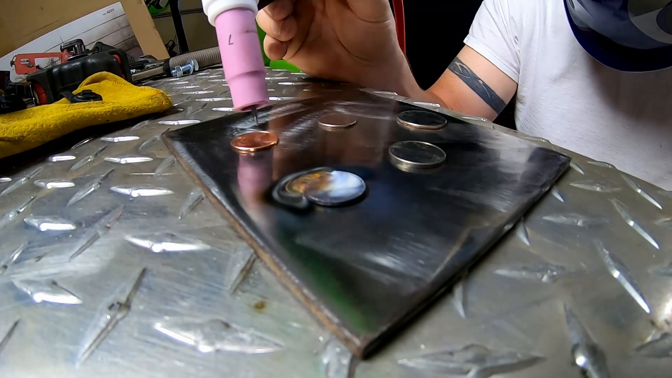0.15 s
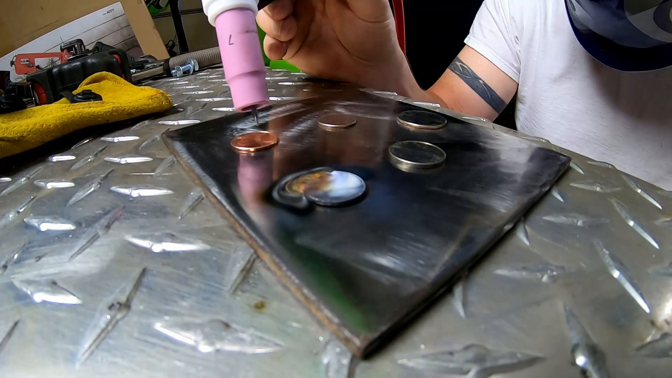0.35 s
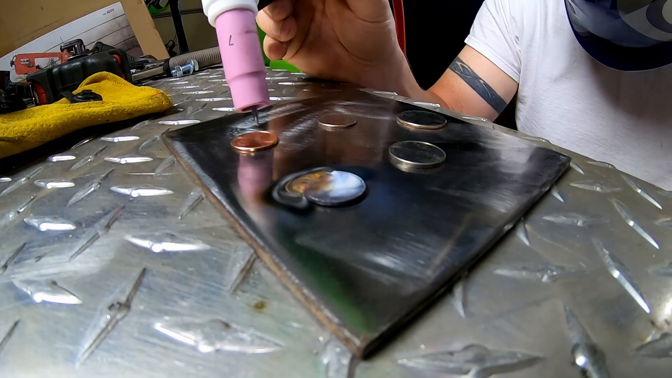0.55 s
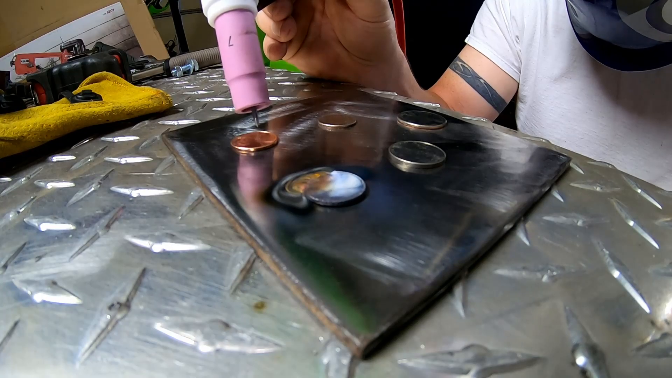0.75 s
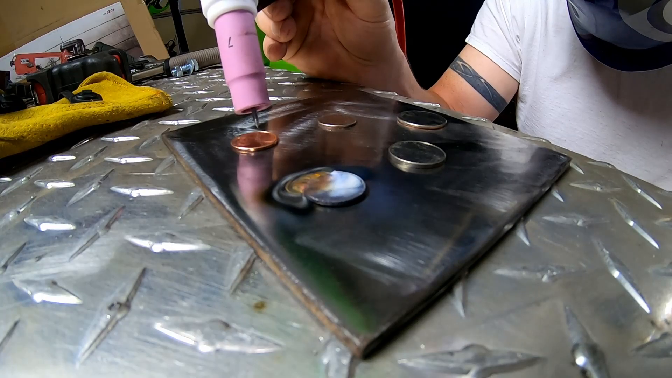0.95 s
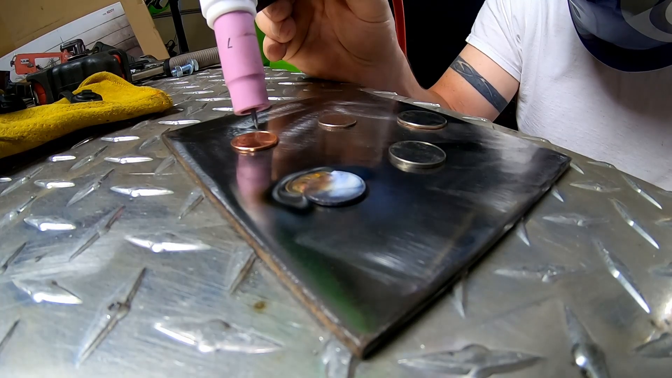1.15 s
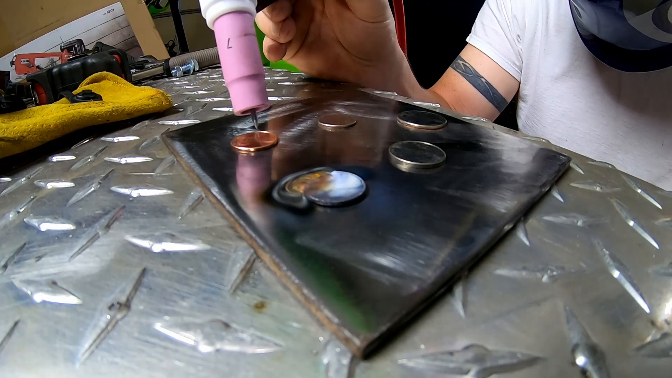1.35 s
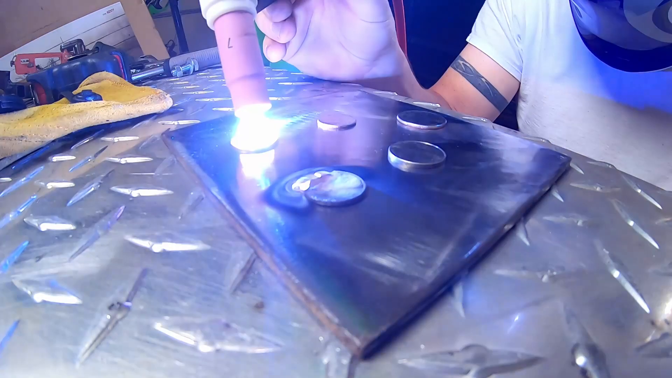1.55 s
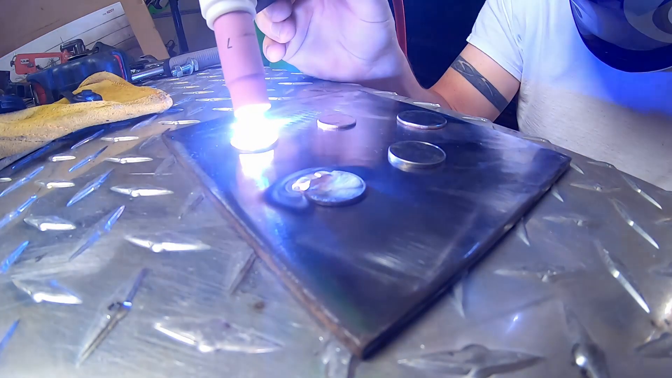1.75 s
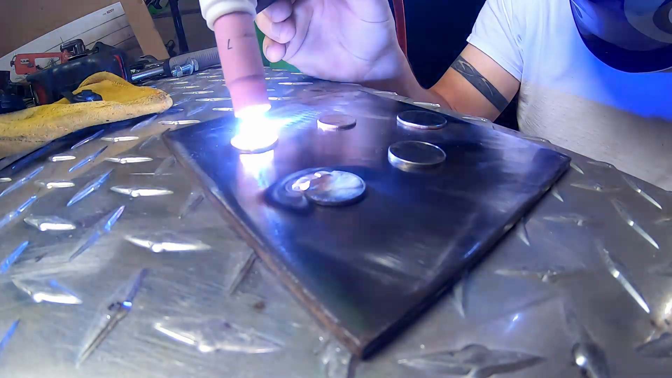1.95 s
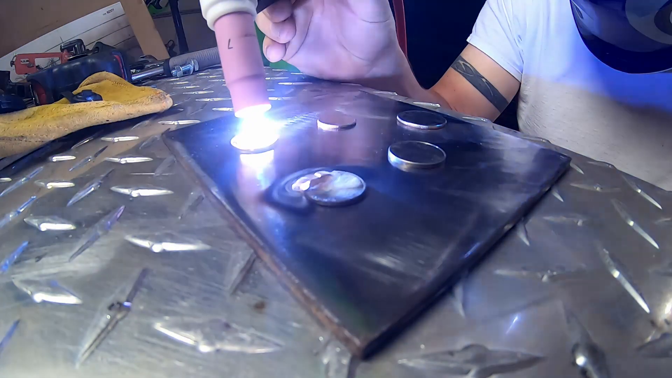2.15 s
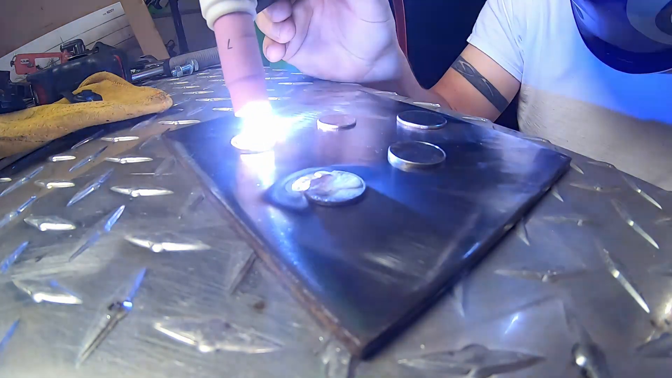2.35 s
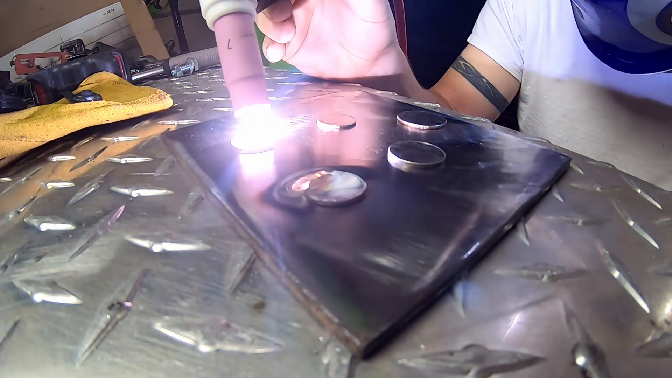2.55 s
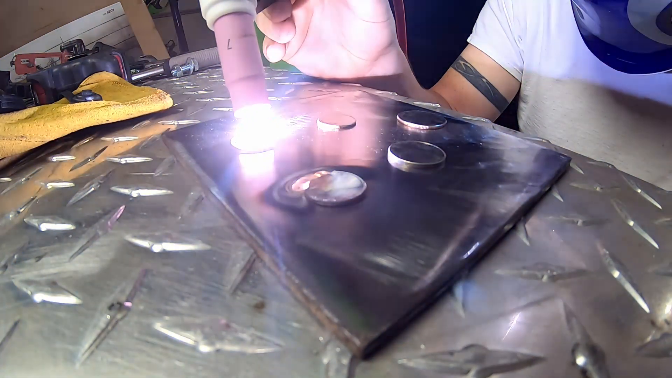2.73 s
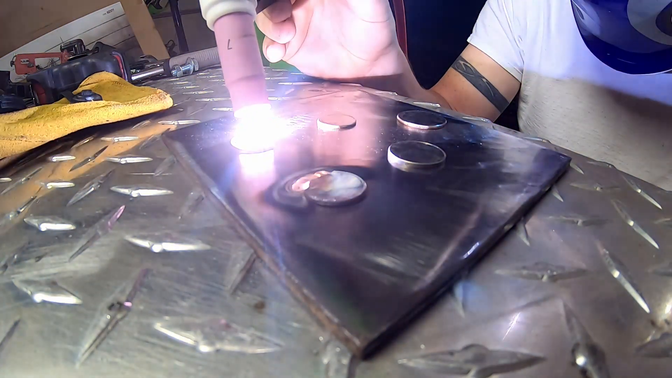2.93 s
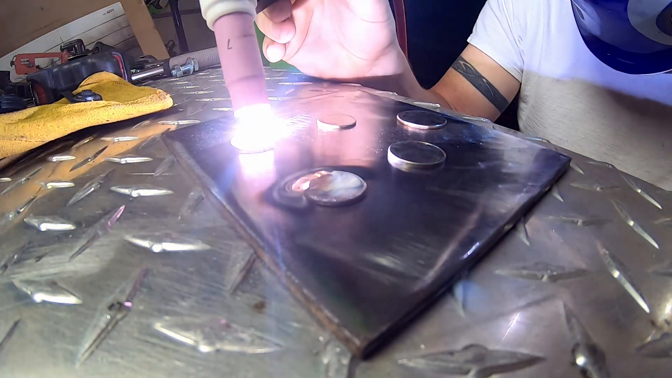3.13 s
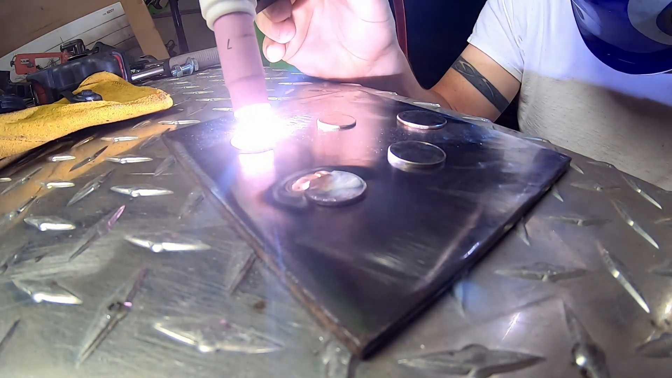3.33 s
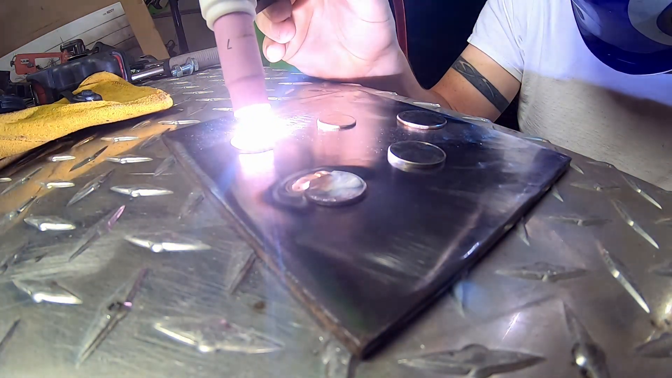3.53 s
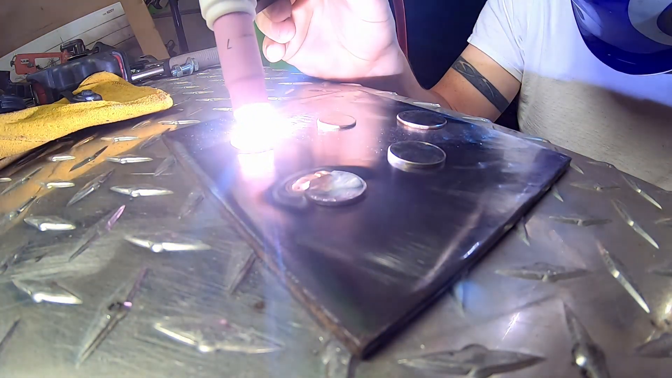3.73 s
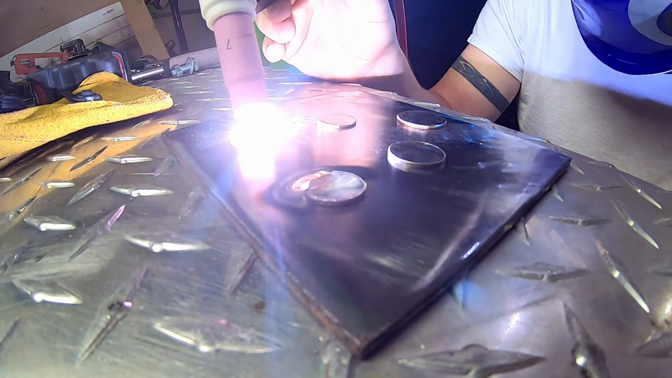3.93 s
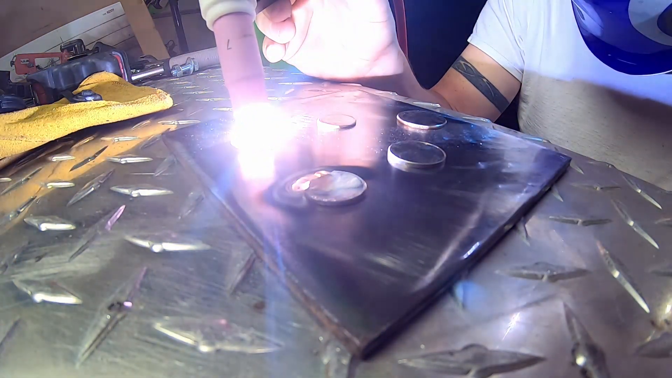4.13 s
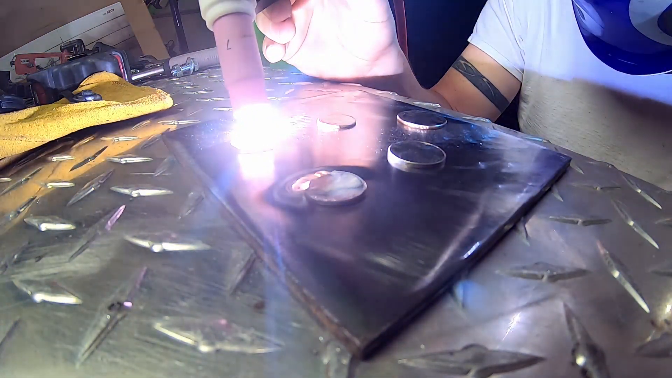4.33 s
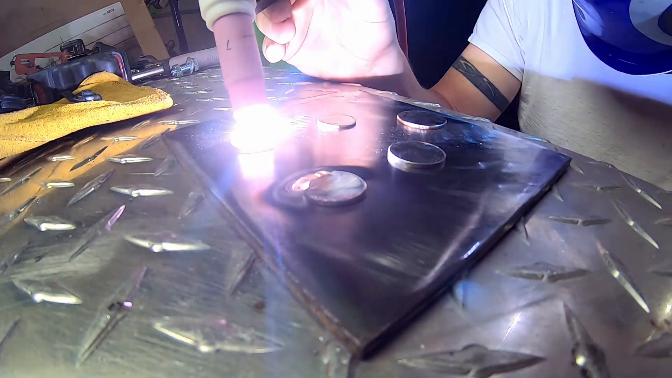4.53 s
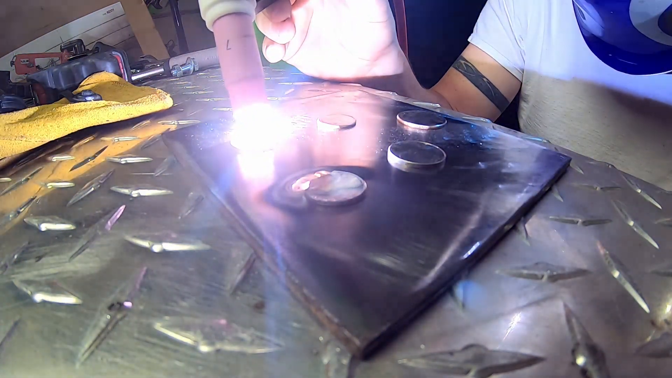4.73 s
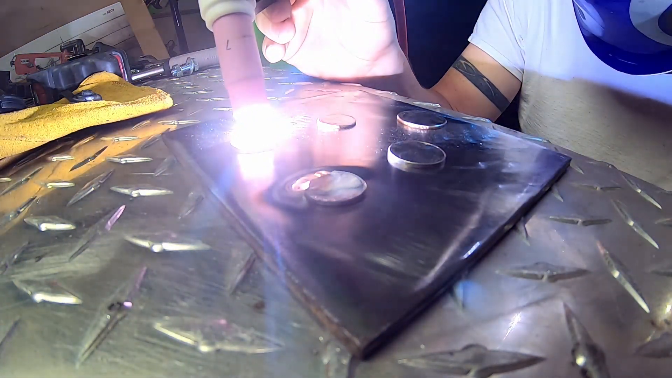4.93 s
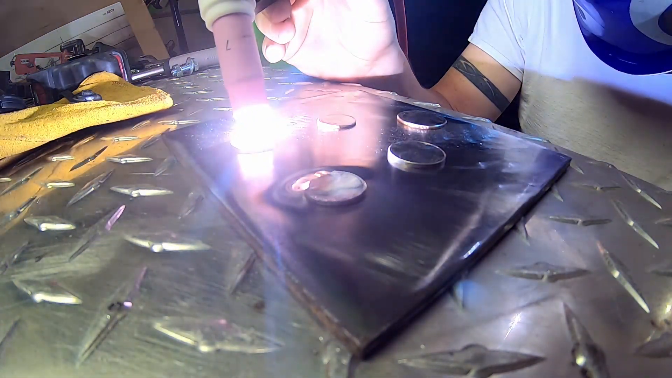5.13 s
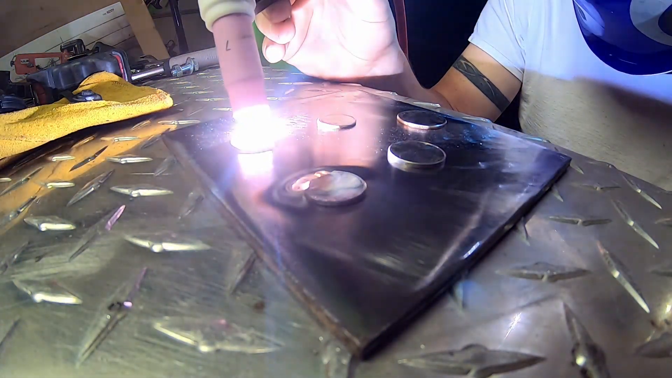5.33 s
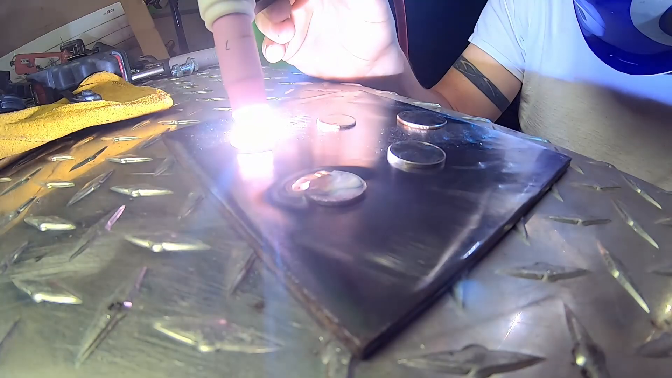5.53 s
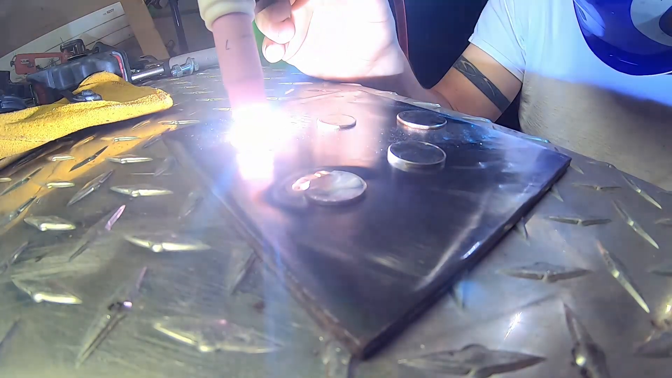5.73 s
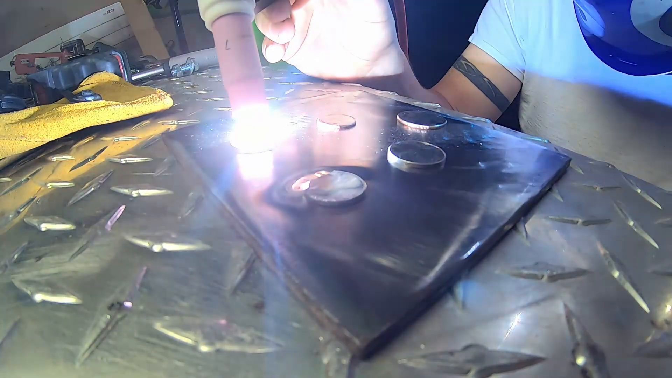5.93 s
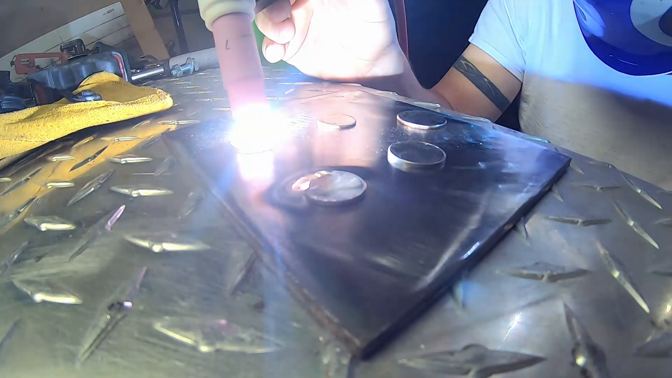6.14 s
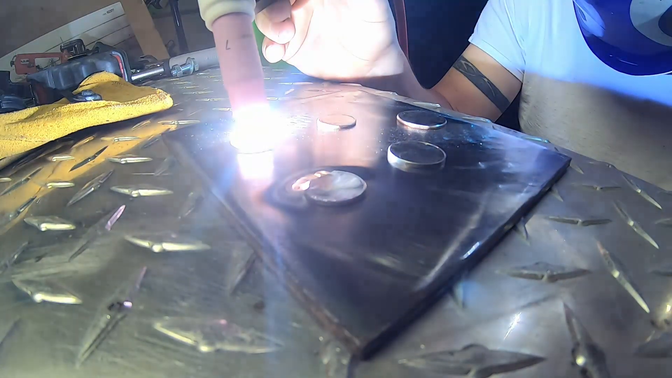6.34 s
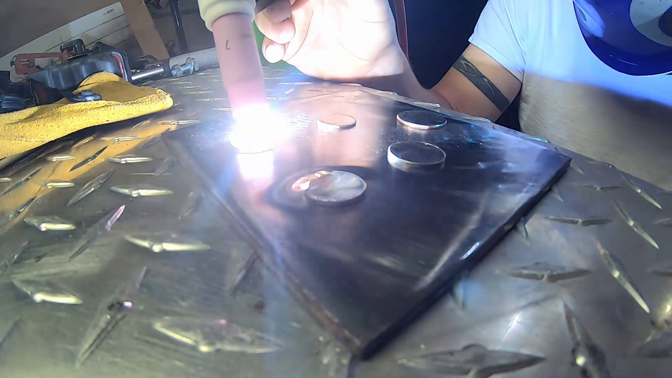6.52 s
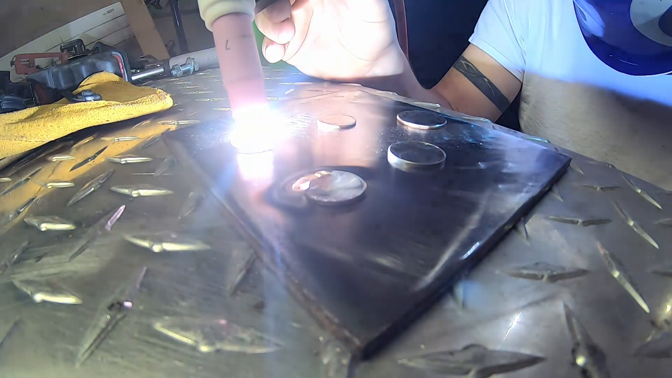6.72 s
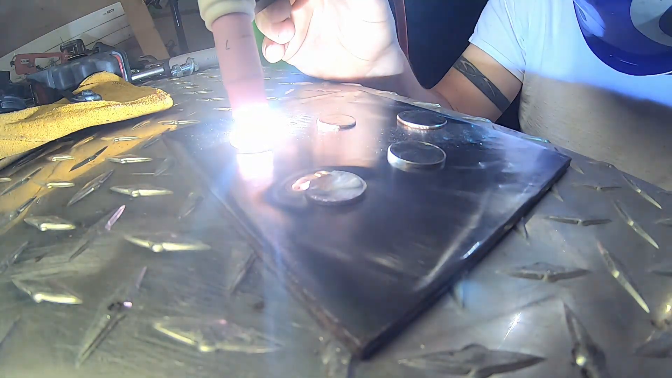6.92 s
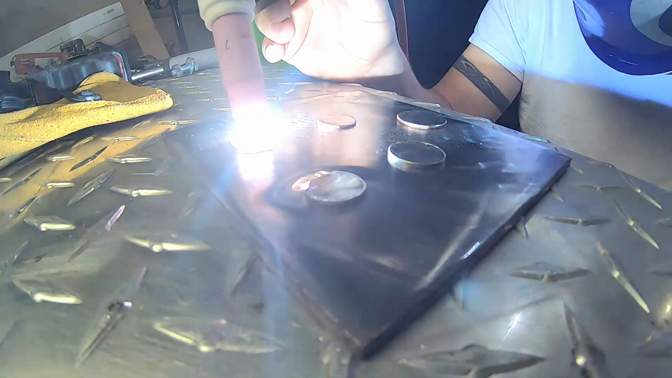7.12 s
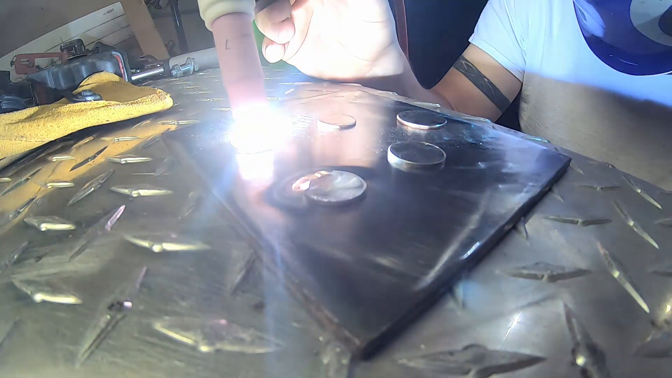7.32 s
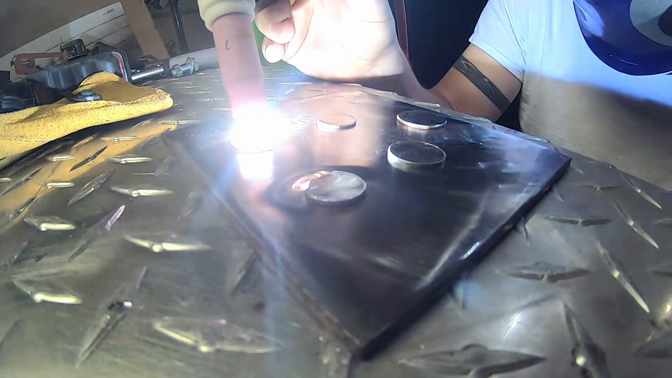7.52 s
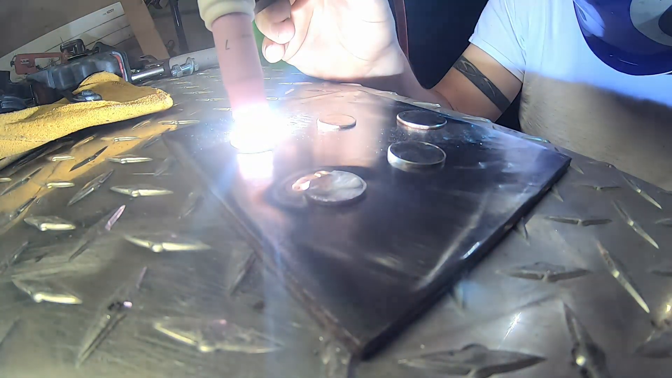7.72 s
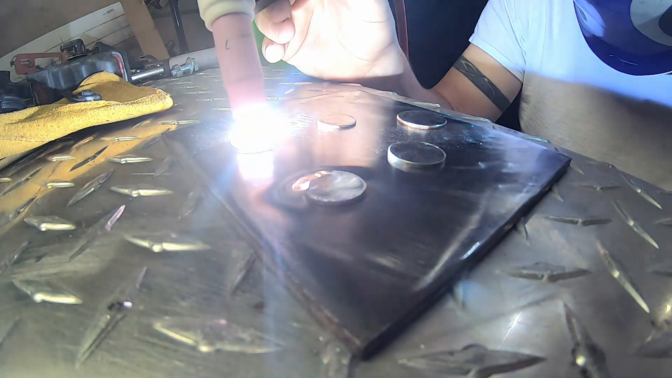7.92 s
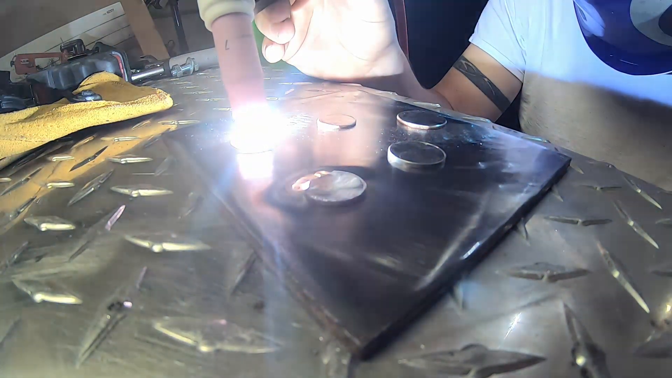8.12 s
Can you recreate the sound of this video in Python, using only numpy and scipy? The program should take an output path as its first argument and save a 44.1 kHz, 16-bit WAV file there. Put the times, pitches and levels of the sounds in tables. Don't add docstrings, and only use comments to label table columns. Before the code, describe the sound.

In a small workshop, steady fan air and a faint wavering hum run for a second and a half. A short gas roar and spark crackle lead into a very loud, distorted pop as a welding arc lights. Bright uneven sputter follows for about a second, then smooth hiss and a thin steady whine remain to the end. Close, mono small camera microphone, with a short room echo.

```python
import sys
import numpy as np
from scipy import signal
from scipy.fft import rfft, irfft, next_fast_len
from scipy.io import wavfile
from scipy.ndimage import uniform_filter1d

SR = 44100
rng = np.random.default_rng(int(sys.argv[2]) if len(sys.argv) > 2 else 0)


def inscribe(sig):
    pcm = np.round(np.clip(np.atleast_2d(sig).T, -1, 1) * 32767)
    wavfile.write(sys.argv[1], SR, pcm.astype(np.int16))


def field_ratio(decibels):
    return 10 ** (np.asarray(decibels, dtype=float) / 20)


N = 364707
T = np.arange(N) / SR

STRIKE_S = 1.60476
CLEAN_S = 2.553

# frequency in Hz, level in dB per Hz.
FAN_COLOUR = [(20, -42), (55, -18), (185, -18), (230, -5), (420, -11), (950, -15), (1300, -18.5),
              (1620, -15.5), (1900, -18.5), (3200, -23.5), (5300, -31), (8000, -39), (11000, -47),
              (16000, -51)]
# frequency in Hz, width in Hz, lift in dB.
FAN_HOUSING = [(65, 11, 5.5), (236.3, 64, 5), (290, 38, -3.5), (456, 16, 7.5), (731.5, 33, 8),
               (1147, 54, 11.5), (1203, 11, 9), (1482, 20, 8.5), (3870, 470, 5.5), (4520, 910, 8)]
# time in seconds, gain in turns.
FAN_SLIP = [
    (0, -.19),
    (2.3, 4),
    (2.94, 5),
    (4.31, 7),
    (6.07, 10),
    (8.27, 13.42),
]
# start in seconds, length in seconds, level in dB.
RUMBLE_SWELLS = [
    (.76, .58, -56),
    (3.25, .65, -59),
    (4.002, 0.26, -49.5),
    (4.25, 1.5, -61),
    (5.55, .35, -55),
    (5.9, 1.1, -63),
    (7.0, 1.4, -54.5),
]
# start in seconds, rise in seconds, hold in seconds, rise in dB, top in dB, fall in dB per second.
ROAR_SHAPE = (1.52, 0.1, 0.12, 17, -38.5, 57)
# frequency in Hz, level in dB per Hz.
ROAR_COLOUR = [(1500, -37), (2700, -10), (3100, 3), (3600, -3), (4200, -4), (6000, -35)]
# frequency in Hz, level in dB per Hz.
STARTER_COLOUR = [(500, -17), (1000, 0.5), (2200, -7), (4200, 0), (5200, -5), (6500, -9), (10000, -8),
                  (13000, -20), (14700, -11), (16000, -6)]
# frequency in Hz, width in Hz, lift in dB.
CUP_RINGS = [(1210, 120, 8), (3060, 230, 4)]
# start in seconds, rise in seconds, hold in seconds, rise in dB, top in dB, fall in dB per second.
FLAP_SHAPE = (1.59, 0.13, -0.1152, 24, -29.5, 127)
# frequency in Hz, level in dB per Hz.
FLAP_COLOUR = [(70, -41), (140, -4.5), (300, -1.5), (600, -4), (1000, -15), (3000, -50)]
COUPLING_HZ = (13.5, 22, 112)
# frequency in Hz, level in dB per Hz.
JET_COLOUR = [(300, -27), (900, -6), (1800, -2), (3500, 0.5), (5200, -4), (7500, -7), (10000, -22),
              (13000, -31), (16000, -51)]
# frequency in Hz, width in Hz, lift or notch in dB.
ARC_PATH = [(2680, 52, -6), (3040, 260, 7.5), (3960, 130, 6), (4200, 70, -2), (4560, 280, 5.5),
            (5330, 190, 4.5), (5550, 300, -6), (6340, 290, -11), (6860, 330, 5), (8500, 200, -8),
            (9120, 450, 4), (9940, 290, -6), (10380, 320, 6.5), (11330, 340, 9.5), (12000, 560, -11),
            (12550, 270, 4), (12900, 300, -7), (14950, 400, -3), (15400, 350, 18)]
# frequency in Hz, level in dB per Hz.
SPUTTER_COLOUR = [(150, -20), (500, -1), (1200, -3.5), (2200, 4), (3500, 0.5), (6000, -1.5), (8000, -2),
                  (10500, 3), (13000, -5.5), (16000, -13.5)]
# time in seconds, level in dB.
SPUTTER_LEVEL = [
    (1.605, -37),
    (1.7, -37),
    (2.1, -35.5),
    (2.3, -32),
    (2.4, -34),
    (2.46, -41.5),
    (2.553, -33.5),
]
# start in seconds, length in seconds, lift at start in dB, lift at end in dB.
FLARES = [(1.707, 0.0092, -1, -4), (1.892, 0.021, 0, 1), (1.926, 0.066, 4, 2.5), (2.032, 0.031, -1, 4),
          (1.98, 0.0072, -11, -2), (2.109, 0.034, 1.5, 6.5), (2.165, 0.0075, -4, 0), (2.213, 0.056, 4.5, 6),
          (2.27, 0.041, 2, 3.5), (2.319, .005, -4, -4), (2.328, 0.016, 8, -1), (2.348, .008, 6, 0),
          (2.376, .012, 5, -2), (2.407, .006, -5, 6), (2.419, .012, 7, -3), (2.448, .008, 10, 1),
          (2.476, 0.035, 10.5, 8), (2.514, 0.0068, 4, 7), (2.523, .027, 5.5, 10)]
# time in seconds, level in dB.
CURRENT = [(1.68, 7.5), (1.74, 8.5), (1.84, 9), (2.05, 5), (2.18, 6.5), (2.28, 5), (2.38, 8.5), (2.47, 6.5),
           (2.58, 0.5), (2.7, 1.5), (3.94, 0.8), (4.12, -1), (8.27, -3)]
# multiple of the base frequency, level in dB.
WHINE_PARTIALS = [(1, 0), (2, -16), (3, -17), (4, -19), (5, -31), (6, -21), (8, -38)]
# time in seconds, peak in dB, frequency in Hz.
PUFFS = [
    (1.7262, -22, 706),
    (1.747, -26, 550),
    (1.831, -28, 500),
    (2.0774, -33, 800),
]
# frequency in Hz, time to fall by 60 dB in seconds, echo level in dB.
ROOM = [(200, 1, -17), (630, 0.27, -7.5), (2020, 0.13, -14.5), (6000, 0.27, -6.5), (8500, 0.24, -6.5),
        (11000, .3, -23), (16000, .2, -14)]


def read(points, hz, axis=1):
    points = np.transpose(points)
    return np.interp(np.log(hz + 1), np.log(points[0] + 1), points[axis])


def level(rows):
    s, db = np.transpose(rows)
    return field_ratio(np.interp(T, s, db)) * (T >= s[0]) * (T <= s[-1])


def evened(x):
    return x / np.sqrt(np.mean(x ** 2) + 1e-20)


def noise(spectrum, lifts=()):
    size = next_fast_len(N)
    hz = np.fft.rfftfreq(size, 1 / SR)
    db = read(spectrum, hz)
    for centre, width, lift_db in lifts:
        db = db + lift_db / (1 + (2 * (hz - centre) / width) ** 2)
    coloured = rfft(rng.standard_normal(N), size) * field_ratio(db)
    return evened(irfft(coloured, size)[:N])


def drift(hz):
    lowpass = signal.butter(2, hz, fs=SR, output="sos")
    return evened(signal.sosfilt(lowpass, rng.standard_normal(N)))


def burst(start, rise, hold, rise_db, top_db, fall_db):
    age = T - start
    climb = rise_db * np.maximum(1 - age / rise, 0)
    fall = fall_db * np.maximum(age - rise - hold, 0)
    return field_ratio(top_db - climb - fall) * (age >= 0)


def current_db():
    return np.interp(T, *np.transpose(CURRENT))


def settling(excess_db, settle_s):
    return excess_db * np.exp(-np.abs(T - CLEAN_S) / settle_s)


def fan_air():
    return field_ratio(-47.5 + 0.25 * drift(hz=2.9)) * noise(FAN_COLOUR, FAN_HOUSING)


def fan_blades():
    blade_hz, slower_db, faster_db = 398.4, -62, -55
    turns = np.cumsum(blade_hz + 0.19 * drift(hz=1.6)) / SR
    faster_turns = turns + np.interp(T, *np.transpose(FAN_SLIP))
    slower = field_ratio(slower_db) * np.sin(2 * np.pi * turns)
    faster = field_ratio(faster_db) * np.sin(2 * np.pi * faster_turns)
    return np.sqrt(2) * (slower - faster)


def rumble():
    bed_db, edge_s = -64, 0.13
    gain = field_ratio(bed_db)
    for start, length, db in RUMBLE_SWELLS:
        to_edge = np.minimum(T - start, start + length - T)
        gain = gain + field_ratio(db) * np.clip(to_edge / edge_s + 0.5, 0, 1)
    return field_ratio(-9.5) * gain * noise([(20, -40), (40, -7), (65, 0.5), (115, 0.5), (200, -41)])


def cup_roar():
    return burst(*ROAR_SHAPE) * field_ratio(2.0 * drift(hz=150)) * noise(ROAR_COLOUR)


def starter_sparks():
    start_s, start_db, growth_db, growth_s = 1.5532, -38, 3.5, 0.024
    growth = np.clip((T - start_s) / growth_s, 0, 1)
    gain = field_ratio(start_db + growth_db * growth) * (T >= start_s) * (T < STRIKE_S)
    return gain * field_ratio(1.3 * drift(hz=500)) * noise(STARTER_COLOUR, CUP_RINGS)


def arc_flap():
    start, rise = FLAP_SHAPE[:2]
    rest = field_ratio(-52.5) * (T > start + rise) * (T < CLEAN_S)
    gain = np.maximum(burst(*FLAP_SHAPE), rest)
    return gain * field_ratio(3.7 * drift(hz=40)) * noise(FLAP_COLOUR)


def strike_pop():
    age = T - STRIKE_S
    surge = -3.4 * np.exp(-np.abs(age) / 0.004) * (age >= 0)
    for hz in COUPLING_HZ:
        surge = signal.lfilter(*signal.butter(1, hz, "high", fs=SR), surge)
    recharge = 0.012 * np.exp(-np.abs(age) / 0.06) * (1 - np.exp(-(age / 0.045) ** 4)) * (age >= 0)
    dip = 0.008 * np.exp(-((age - 0.04) / 0.012) ** 2)
    kick = np.maximum(age - 0.0016, 0)
    fizz = 0.04 * (kick > 0) * rng.standard_normal(N)
    ring = 0.17 * np.sin(2 * np.pi * 1630 * kick)
    return surge + recharge - dip - np.exp(-kick / 0.0005) * (ring + fizz)


def jet():
    young_db = -36.5 - 5.5 * (T - STRIKE_S)
    steady_db = -45 + settling(excess_db=3, settle_s=0.12)
    gain = field_ratio(np.where(T < CLEAN_S, young_db, steady_db)) * (T > STRIKE_S)
    roughness_db = 0.14 + 0.99 * gain / gain.max()
    return gain * field_ratio(roughness_db * drift(hz=90)) * noise(JET_COLOUR, ARC_PATH)


def sputter():
    lift_db = np.zeros(N)
    for start, length, first_db, last_db in FLARES:
        lift_db += np.interp(T, (start, start + length), (first_db, last_db), 0, 0)
    flicker_db = 0.9 * drift(hz=80) + 1.4 * drift(hz=500)
    fizz_db = -63.5 + 1.9 * current_db() + settling(excess_db=11, settle_s=0.07)
    fizz = (T > CLEAN_S) * field_ratio(fizz_db)
    gain = uniform_filter1d(level(SPUTTER_LEVEL) * field_ratio(lift_db) + fizz, size=30)
    near = [(hz, width, 0.45 * db) for hz, width, db in ARC_PATH]
    return gain * field_ratio(flicker_db) * noise(SPUTTER_COLOUR, near)


def whine():
    turns = np.cumsum(1709.5 + 0.431 * drift(hz=1)) / SR
    stack = np.zeros(N)
    for multiple, db in WHINE_PARTIALS:
        stack += field_ratio(db) * np.sin(2 * np.pi * (multiple * turns + rng.random()))
    rise = np.clip((T - 1.638) / 0.032, 0, 1)
    return np.sqrt(2) * field_ratio(-49 + current_db() + 0.65 * drift(hz=25)) * rise * stack


def puffs():
    out, t = np.zeros(N), np.arange(300) / SR
    for start, peak_db, hz in PUFFS:
        fade = field_ratio(peak_db - 8.7 * t / 0.001)
        out[round(start * SR):][:300] += fade * np.sin(2 * np.pi * hz * t)
    return out


def room(x):
    hz, t, bands = signal.stft(rng.standard_normal(SR // 2), SR, nperseg=256)
    t60 = read(ROOM, hz)[:, None]
    wet_db = read(ROOM, hz, axis=2)[:, None]
    even_energy = np.sqrt(6 * np.log(10) / t60 / SR)
    shape = field_ratio(wet_db - 60 * t / t60) * even_energy
    tail = signal.istft(bands * shape, SR, nperseg=256)[1]
    return signal.fftconvolve(x, np.r_[np.zeros(120), tail])[:N]


def scene():
    ignition = cup_roar() + starter_sparks() + arc_flap()
    airborne = fan_air() + ignition + jet() + sputter() + puffs()
    mono = airborne + room(airborne) + whine() + fan_blades() + rumble()
    return np.array([mono, mono])


def low_pass(x):
    return signal.sosfilt(signal.butter(12, 16900, fs=SR, output="sos"), x)


def record(dry):
    age = T - STRIKE_S
    duck_db = -12.0 * np.clip(1.4 - age / 0.065, 0, 1) * (age >= 0)
    edge = signal.firwin(1023, 15760, window=("kaiser", 9), fs=SR)
    limited = signal.oaconvolve(dry * field_ratio(duck_db), edge[None], "same")
    clipped = np.clip(limited + strike_pop(), -1, 1)
    smoothing = signal.firwin(63, 16500, window=("kaiser", 6), fs=SR)
    mix = signal.oaconvolve(clipped, smoothing[None], "same")
    return low_pass(mix)


dry = scene()
out = record(dry)
inscribe(out)
```